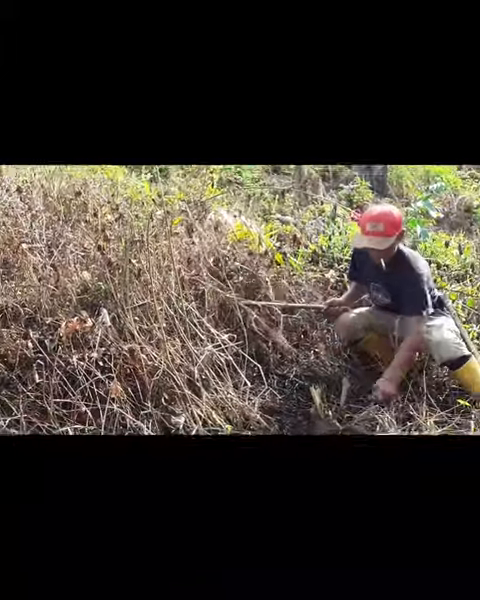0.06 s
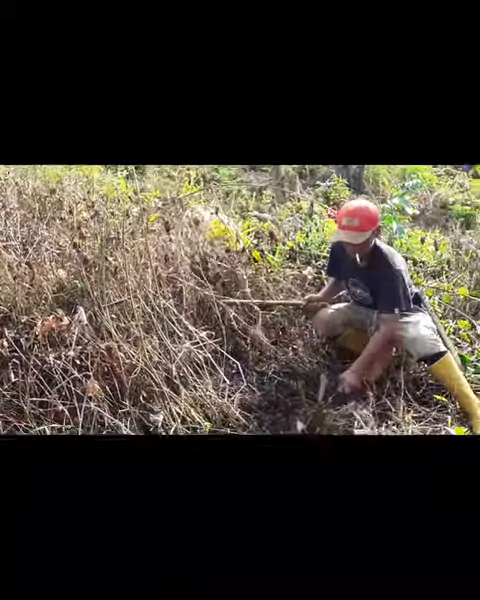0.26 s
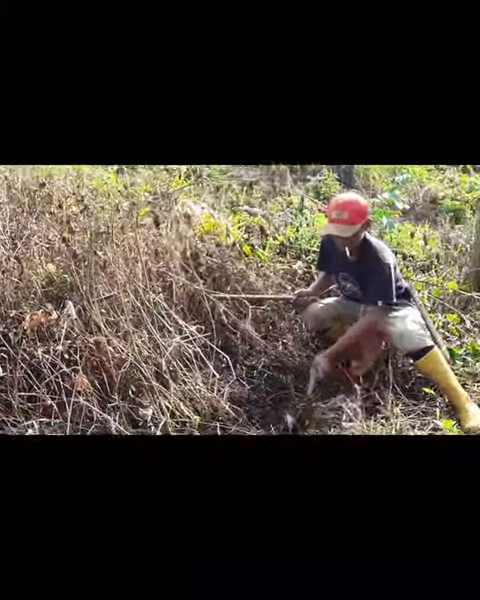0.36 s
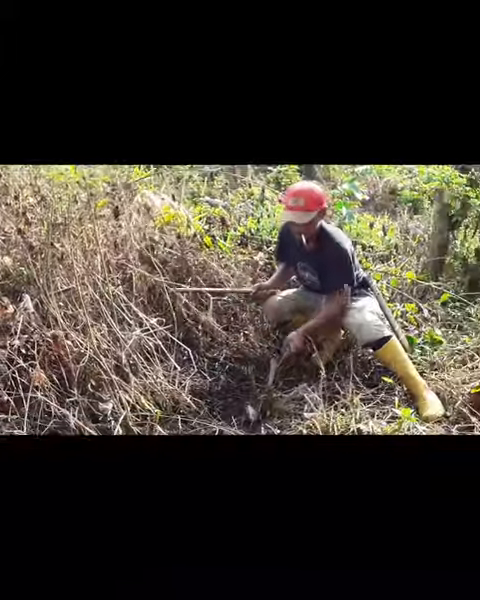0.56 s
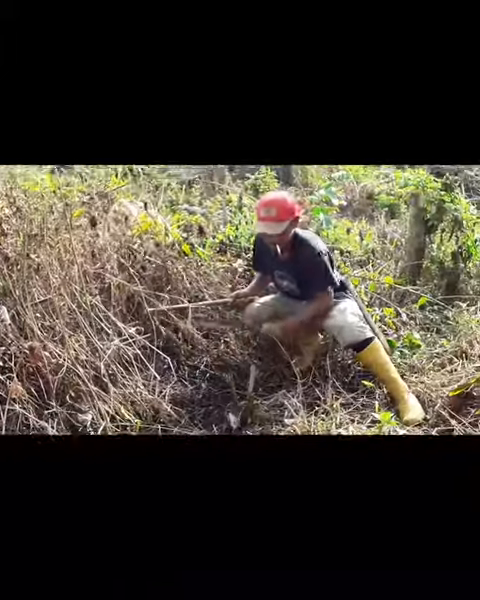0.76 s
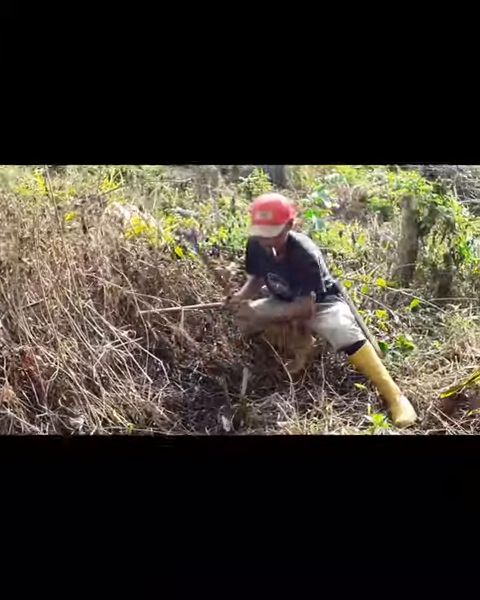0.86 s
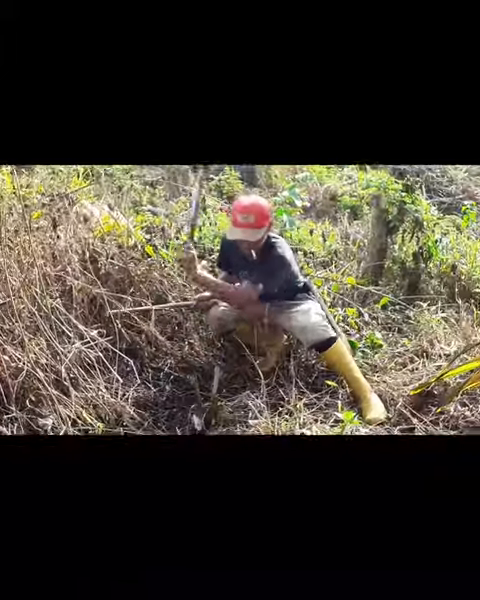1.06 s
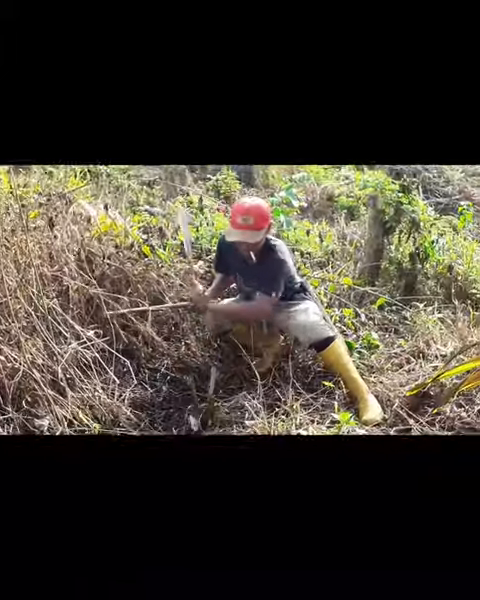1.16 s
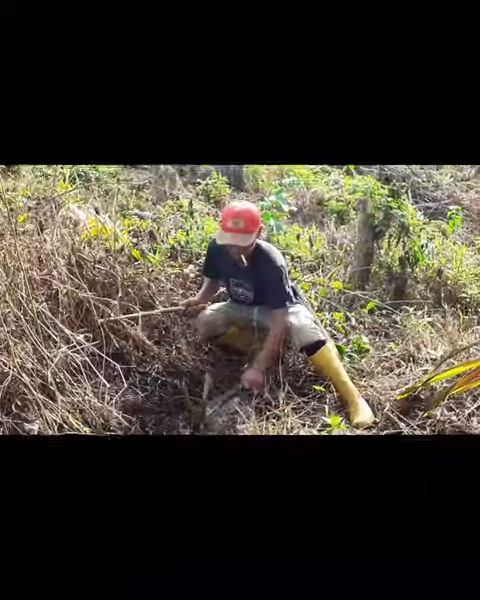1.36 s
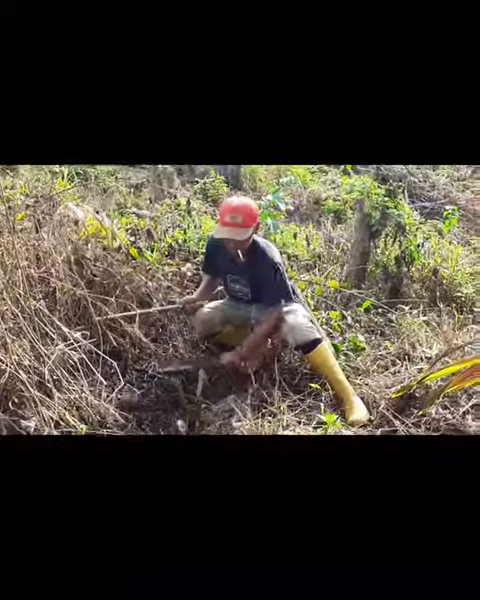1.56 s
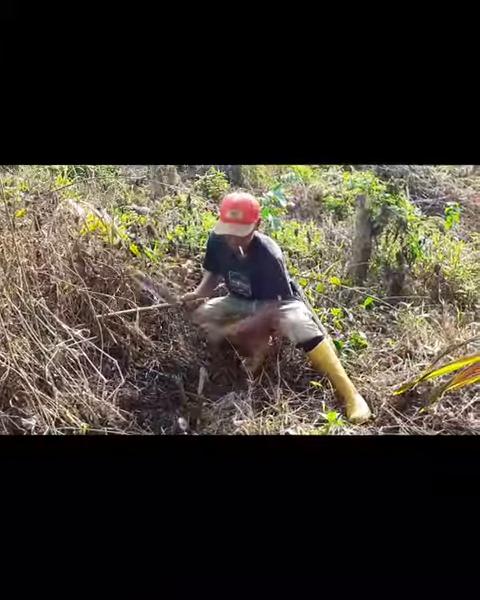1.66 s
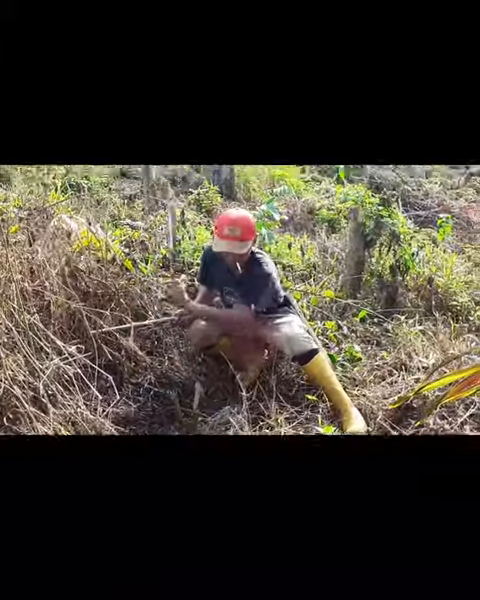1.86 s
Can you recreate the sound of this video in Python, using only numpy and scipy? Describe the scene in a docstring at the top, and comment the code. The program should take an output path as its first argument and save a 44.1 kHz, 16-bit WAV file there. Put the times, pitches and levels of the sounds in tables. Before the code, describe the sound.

Two sharp machete chops crack through dry brush outdoors, amid rustling stems, birdsong and cricket trill

```python
"""A machete chops twice through dry weeds into the ground, close to a two-port microphone outdoors.
Each chop is a burst of dense clicks, a short blade ring, a tumble of stem bits and thuds of ringing soil.
Around the blows, filtered crackle makes the weeds swish, and stems snap and knock.
Several birds call as gliding near-sine or reedy tones with an echo; a cricket trills in pulses of
narrow noise over the hiss of far insects and birds, which is shaped noise with a low rumble."""
import sys
import numpy as np
from scipy import signal
from scipy.fft import rfft, irfft, next_fast_len
from scipy.io import wavfile
from scipy.ndimage import uniform_filter1d

SR = 44100
rng = np.random.default_rng(int(sys.argv[2]) if len(sys.argv) > 2 else 0)


def linear_from_db(decibels):
    """Turn decibels (scalar or array-like) into linear amplitude factors; 0 gives 1."""
    return 10 ** (np.asarray(decibels, float) / 20)


def wav_out(sig):
    """Save sig, one row per channel (or a flat mono array), as 16-bit PCM at SR to the path in sys.argv[1]."""
    wavfile.write(sys.argv[1], SR, np.round(np.clip(np.atleast_2d(sig).T, -1, 1) * 32767).astype(np.int16))


N = 83790  # length of the scene in samples

# Levels in all tables come before panning, flutter, echo and the final filters.
# Tone colour of cut stems: pitch_hz, relative level_db
STEM_COLOUR = [(240, -25), (400, -4.5), (921, -13), (2930, -5), (3750, -0.5), (8760, -7), (14600, -12)]


def evened(x):
    """Scales a sound to an rms of 1."""
    return x / np.sqrt(np.mean(x ** 2) + 1e-20)


def read(points, hz):
    """Reads a table at any pitch, in straight lines over log pitch."""
    f, value = np.transpose(points)
    return np.interp(np.log(hz + 1), np.log(f + 1), value)


def add(mix, start_s, sound):
    """Lays a sound into the mix, cut off at the end."""
    at = round(start_s * SR)
    part = mix[..., at:at + sound.shape[-1]]
    part += sound[..., :part.shape[-1]]


def pan(left_minus_right_db):
    """Gains of left and right for a level difference."""
    half_db = left_minus_right_db / 2
    return linear_from_db(np.array([[half_db], [-half_db]]))


def colour(x, points):
    """Filters the last axis by a spectrum table."""
    size = next_fast_len(x.shape[-1] + 512)
    gain = linear_from_db(read(points, np.fft.rfftfreq(size, 1 / SR)))
    return irfft(rfft(x, size) * gain, size)[..., :x.shape[-1]]


def crackle(shape, per_s, spread_db):
    """Randomly timed clicks of random sign, a few of them large."""
    size = linear_from_db(spread_db * np.minimum(rng.exponential(1, shape), 4))
    sign = rng.choice([-1., 1.], shape)
    return size * sign * (rng.random(shape) < per_s / SR)


def slow(top_hz, span=15):
    """Slow random wander of rms 1: 20 sines from top_hz / span to top_hz, weaker as they get faster."""
    t = np.arange(N) / SR
    rates = np.geomspace(top_hz / span, top_hz, num=20)
    return evened(sum(np.sin(2 * np.pi * (f * t + rng.random())) / np.sqrt(f) for f in rates))


def rise_fall(t, rise, t60):
    """Bell-shaped rise to t = 0, then an even fall in dB."""
    return np.exp(-(np.minimum(t, 0) / rise) ** 2) * linear_from_db(-60 * np.maximum(t, 0) / t60)


def ring(modes, tilt_db, t, share=1):
    """Dying modes of a struck thing; the tilt is in dB per octave from the second mode."""
    out = 0
    for hz, db, t60 in modes:
        level_db = db + tilt_db * np.log2(hz / modes[1][0]) - 60 * t / t60 / share
        out = out + linear_from_db(level_db) * np.sin(2 * np.pi * hz * t)
    return out


def machete():
    """The two chops and the thuds on the soil, as they reach the two ports."""
    return two_ports(chops() + thuds())


def chops():
    """The blade bursts through stems and rings briefly, and the cut stems tumble."""
    # loudest_s, crack level_db, rise_s, crack t60_s, falling stems level_db before bits, stems t60_s
    blows = [(0.2034, -16.5, .002, 0.023, -33, .12), (1.395, -16, 0.00091, 0.023, -35.5, 0.13)]
    # Tone colour of the crack: pitch_hz, relative level_db
    crack_colour = [(240, -33.5), (400, -11.5), (800, 0.5), (1060, -18), (1350, 2.5), (2840, 0),
                    (4580, 0.5), (6640, -2.5), (8760, -0.5), (10400, -9.5), (14800, -8), (16400, -44)]
    # Ringing of the blade: pitch_hz, relative level_db, t60_s
    blade_modes = [(3820, -8, 0.084), (4720, -6, .16)]
    blade_db, bits_share = -38, 2  # bits_share: rms of the stem bits against the stem crackle
    mix, t = np.zeros((2, N)), np.arange(SR // 2) / SR
    for s, crack_db, rise, t60, stems_db, stems_t60 in blows:
        u = t - 4 * rise  # time from the loudest moment
        crack = evened(colour(crackle(len(t), 16000, 3.5), crack_colour))
        burst = linear_from_db(crack_db) * rise_fall(u, rise, t60) * crack
        # one crackle shared by both sides, and one for each side
        stems = crackle(len(t), 5000, 3) + crackle((2, len(t)), 5000, 3)
        stems = evened(colour(stems, STEM_COLOUR)) + bits_share * debris(len(t))
        tumble = linear_from_db(stems_db - 60 * t / stems_t60) * np.clip(u / rise / 2 + 1, 0, 1)
        add(mix, s - 4 * rise, burst + tumble * stems)
        add(mix, s, linear_from_db(blade_db) * ring(blade_modes, 0, t))
    return mix


def debris(size):
    """Bits of stem of many sizes, each a short woody ring."""
    cycles, hits_per_s = 11, 30  # rate for each size, in the shared and in each side's crackle
    out = np.zeros((2, size))
    for hz in np.geomspace(900, 9500, num=24):
        turns = np.arange(int(SR * cycles / hz)) * hz / SR
        fade = linear_from_db(read(STEM_COLOUR, hz) - 40 * turns / cycles)
        grain = np.sin(2 * np.pi * turns) * fade * hz
        hits = crackle(size, hits_per_s, 4) + crackle((2, size), hits_per_s, 4)
        out += signal.oaconvolve(hits, grain[None], axes=1)[:, :size]
    return evened(out)


def thuds():
    """Struck soil rings in a few low modes after a short straight rise."""
    # Modes of the soil: pitch_hz, relative level_db, t60_s before each thud's share
    soil_modes = [(64.5, -11, 0.13), (104.4, 2.5, 0.13), (155.2, -9.5, 0.17), (246, 4, 0.069),
                  (301, 3.5, 0.076), (549, -7, 0.051)]
    # start_s, level_db, tilt_db per octave toward the higher modes, share of the ring time
    thud_rows = [(.201, -38.5, 3.5, 1.02), (.262, -56, -5.5, 0.91), (1.004, -69.5, -6, 1.4),
                 (1.318, -57, -2, .7), (1.396, -38, -0.3, 1.34), (1.836, -54.5, 3.5, 0.53)]
    rise_s = 0.0039
    mix, t = np.zeros((2, N)), np.arange(SR // 2) / SR
    for s, db, tilt_db, share in thud_rows:
        add(mix, s, linear_from_db(db) * np.minimum(t / rise_s, 1) * ring(soil_modes, tilt_db, t, share))
    return mix


def two_ports(x):
    """Close sounds reach the two ports with a level and phase difference at each pitch."""
    # pitch_hz, left minus right level_db
    port_levels = [(60, -3.5), (550, -3.5), (1400, 1.5), (5500, -7), (9000, 6), (15000, 7.5)]
    # pitch_hz, left lead_rad
    port_leads = [(0, 0), (3880, 2), (6030, 17.5), (13100, 19.5), (15100, 36.5)]
    hz = np.fft.rfftfreq(N, 1 / SR)
    lead = np.interp(hz, *np.transpose(port_leads))
    half = linear_from_db(read(port_levels, hz) / 2) * np.exp(.5j * lead)  # each side takes half the difference
    return irfft(rfft(x) * np.array([half, 1 / half]), N)


def weeds():
    """Dry weeds: swishing leaves, single snaps and hollow knocks."""
    return swishes() + snaps() + knocks()


def swishes():
    """Clumped crackle of dry leaves that swells and fades."""
    # loudest_s, level_db, rise_s, t60_s
    swish_rows = [(.255, -51, 0.061, 0.32), (.345, -57, 0.047, 0.53), (.545, -65.5, 0.013, 0.9),
                  (.695, -66, 0.069, 1), (0.923, -59.5, 0.0088, 0.37), (1.338, -62.5, 0.036, 1),
                  (1.44, -55, 0.024, 0.66), (1.393, -38, 0.0032, 0.025), (1.695, -61, 0.015, 0.94),
                  (1.838, -57, 0.026, 0.29)]
    # Tone colour of leaves: pitch_hz, relative level_db
    leaf_colour = [(350, -32), (700, -16), (1130, -20), (2440, -7), (4500, -8.5), (8270, -9), (15300, -11),
                   (16000, -38)]
    t = np.arange(N) / SR
    power = sum((linear_from_db(db) * rise_fall(t - s, rise, t60)) ** 2 for s, db, rise, t60 in swish_rows)
    leaves = evened(colour(crackle((2, N), per_s=2200, spread_db=0.5), leaf_colour))
    clumps = linear_from_db(1.5 * slow(65))
    return leaves * np.sqrt(power) * clumps * pan(-2)


def snaps():
    """A snapping stem gives a click and a short puff of noise within a band."""
    # start_s, level_db before the band filter, low_hz, high_hz, left minus right level_db
    snap_rows = [(0.177, -46, 3000, 15000, 2), (0.4195, -42.5, 6000, 14700, 14.5),
                 (0.5744, -34, 4950, 6900, 5), (0.581, -46.5, 6000, 14000, 17),
                 (0.9213, -38, 1550, 15000, 10), (1.576, -46, 7020, 15000, 15.5),
                 (1.6878, -43, 8000, 15200, 17), (1.8004, -39.5, 1970, 13000, 7.5),
                 (1.8354, -37, 710, 15000, -12.5), (1.8424, -41.5, 5000, 15000, -18)]
    rise_s, t60_s, click = 0.00087, .0055, 1.18  # click: its height against the puff
    mix, t = np.zeros((2, N)), np.arange(3000) / SR
    for s, db, low_hz, high_hz, pan_db in snap_rows:
        puff = rng.standard_normal((2, len(t))) * rise_fall(t - rise_s, rise_s / 2, t60_s)
        puff = (puff + 0.4 * puff[::-1]) / 2  # the sides share part of the noise
        puff[:, round(rise_s * SR)] += click
        band = signal.butter(3, [low_hz, high_hz], "band", fs=SR, output="sos")
        add(mix, s, linear_from_db(db) * pan(pan_db) * signal.sosfilt(band, puff))
    return mix


def knocks():
    """A hollow stem rings as one dying tone."""
    # start_s, level_db
    knock_rows = [(.345, -70), (.918, -66)]
    pitch_hz, t60_s = 734, 0.046
    mix, t = np.zeros((2, N)), np.arange(3000) / SR
    for s, db in knock_rows:
        add(mix, s, linear_from_db(db - 60 * t / t60_s) * np.sin(2 * np.pi * pitch_hz * t))
    return mix


def bird(calls, partials, pan_db, wet_db, flutter_db=3):
    """Calls along their pitch curves, with wobble, flutter and the echo of the grove."""
    flutter_hz = 130
    mix, wobble = np.zeros(N), 1 + .005 * slow(flutter_hz)
    for call in calls:
        s, hz, db = np.transpose(call)
        t = np.arange(s[0], s[-1], 1 / SR)
        pitch = uniform_filter1d(np.interp(t, s, hz), size=60)
        turns = np.cumsum(pitch * np.interp(t * SR, np.arange(N), wobble)) / SR
        edge = np.clip(np.minimum(t - s[0], s[-1] - t) / 0.004, 0, 1)  # 4 ms fades
        tone = sum(linear_from_db(p_db) * np.sin(2 * np.pi * k * turns) for k, p_db in partials)
        add(mix, s[0], np.sqrt(2) * edge * linear_from_db(np.interp(t, s, db)) * tone)
    mix = mix * linear_from_db(flutter_db * slow(flutter_hz, span=3))
    return pan(pan_db) * (mix + linear_from_db(wet_db) * grove_echo(mix))


def grove_echo(x):
    """Many small reflections from the grove, dying away after a short gap."""
    t60_s, gap_s = 0.41, 0.0089
    t = np.arange(SR // 2) / SR
    tail = crackle((2, len(t)), 2000, 0.4) * linear_from_db(-60 * t / t60_s) * (t > gap_s)
    return signal.fftconvolve(x[None], tail / np.linalg.norm(tail[0]), axes=1)[:, :N]


def chirping_bird():
    """Thin high chirps of a small bird, each an arch of pitch in a near-sine tone."""
    # start_s, length_s, first_hz, top_hz, last_hz, top at share of length, level_db, loudest at share
    chirp_rows = [(0.376, 0.032, 7400, 8740, 7200, 0.14, -54, 0.42),
                  (1.315, 0.065, 9650, 9700, 8000, 0.11, -59.5, 0.84),
                  (1.466, 0.098, 8260, 9150, 8300, 0.45, -59, 0.65),
                  (1.619, 0.041, 8000, 9020, 8050, 0.43, -56, 0.29),
                  (1.716, 0.045, 8320, 8570, 8420, 0.58, -55, 0.75),
                  (1.811, 0.057, 7750, 8670, 8400, 0.44, -53, 0.6)]
    return bird([arch(*row) for row in chirp_rows], [(1, 0.046)], -13.0, -10, flutter_db=3.5)


def arch(start, length, first_hz, top_hz, last_hz, top, db, loudest):
    """Pitch and level curve of one chirp."""
    rise_power, fall_power, edge_db = 4.7, 1.9, -8.5  # power 1 is straight, 2 is round
    u = np.linspace(0, 1, num=24)
    rising = (top_hz - first_hz) * abs(1 - u / top) ** rise_power
    falling = (top_hz - last_hz) * abs((u - top) / (1 - top)) ** fall_power
    hz = top_hz - np.where(u < top, rising, falling)
    level_db = db + np.interp(u, [0, loudest, 1], [edge_db, 0, edge_db / 2])
    return np.transpose([start + u * length, hz, level_db])


def singing_bird():
    """A repeating song of a rising note, a falling whistle and a low warble, in near-sine tones."""
    # The three notes: time_s, pitch_hz, level_db
    rising_note = [(1.14, 1300, -84), (1.16, 2000, -70), (1.174, 2330, -68)]
    whistle = [(1.197, 3040, -76), (1.21, 3040, -70), (1.248, 3103, -65), (1.268, 2950, -73),
               (1.281, 2720, -53), (1.308, 2480, -70)]
    warble = [(1.472, 2720, -63), (1.505, 2380, -62.5), (1.535, 2420, -64.5), (1.553, 2275, -55.5),
              (1.57, 2115, -88.5)]
    song = twice(rising_note, later_s=.622, db=-4)
    song += twice(whistle, later_s=.617, db=-0.097)
    song += twice(warble, later_s=-.605, db=-4)  # the added warble comes earlier
    return bird(song, [(1, 0.046)], 0.11, -3.5)


def twice(call, later_s, db):
    """A call and its copy at another time and level."""
    return [call, np.array(call) + [later_s, 0, db]]


def far_bird():
    """Farther falling notes in near-sine tones, with more echo than direct sound."""
    # One list for each note: time_s, pitch_hz, level_db
    falling_notes = [
        [(.435, 2710, -77), (.5, 2380, -78)],
        [(.6, 2813, -68), (.665, 2210, -73)],
        [(.705, 2492, -71), (.76, 2236, -70.5)],
        [(1.625, 3216, -63), (1.68, 2930, -71.5), (1.71, 2780, -69)],
    ]
    return bird(falling_notes, [(1, 0.046)], 0.09, 3.1)


def reedy_bird():
    """Reedy notes of three partials, the second strongest, with added buzzes."""
    # One list for each note: time_s, pitch_hz of the second partial, level_db
    reed_notes = [
        [(.552, 3900, -76), (.576, 3900, -61), (.598, 4190, -67), (.608, 4290, -74)],
        [(1.018, 3905, -76), (1.05, 3790, -69), (1.104, 3800, -65), (1.12, 4010, -66), (1.14, 4030, -66)],
        [(1.61, 3840, -68), (1.655, 3946, -72.5)],
    ]
    # Multiple of the second partial's pitch, relative level_db
    reed_partials = [(.5, -11), (1, 0), (1.5, -15)]
    # start_s, length_s, level_db at the start
    buzz_rows = [(0.598, 0.074, -74.5), (1.647, 0.098, -74.5)]
    return bird(reed_notes + [buzz(*row) for row in buzz_rows], reed_partials, .1, -6)


def buzz(start, length, db):
    """A fast uneven trill around one pitch, 6 dB louder in its middle."""
    t = np.arange(0, length, .001)
    trill_per_s = 37 * rng.uniform(0.394, 1.5, len(t))
    swing_hz = 340 * rng.uniform(0.24, 1.14, len(t))
    hz = 3940 + swing_hz * np.sin(2 * np.pi * np.cumsum(trill_per_s) / 1000)
    return np.transpose([start + t, hz, db + 6 * np.sin(np.pi * t / length)])


def cricket():
    """Steady pulses, each a short rising scrape of narrow noise near one pitch."""
    # time_s, pulses_per_s
    pulse_rate = [(0, 63), (.4, 70.6), (1.9, 69.8)]
    pitch_hz, sweep_hz, pole_width_hz = 8400, 485, 93
    level_db, sounding_share, start_share = -70.5, .45, 0.88  # shares of a pulse
    t = np.arange(N) / SR
    pulses = np.cumsum(np.interp(t, *np.transpose(pulse_rate))) / SR + start_share
    at = np.minimum(pulses % 1 / sounding_share, 1)  # place within the scrape, then rest at 1
    gate = np.sin(np.pi * at) ** 2
    turn = np.exp(2j * np.pi * np.cumsum(pitch_hz + sweep_hz * (at - .5)) / SR)
    r = np.exp(-np.pi * pole_width_hz / SR)
    noise = rng.standard_normal((2, N)) + 1j * rng.standard_normal((2, N))
    fuzz = signal.lfilter([1], np.convolve([1, -r], [1, -r]), noise)
    scrape = evened(gate * (turn * fuzz).real)
    return scrape * linear_from_db(level_db + 1.1 * slow(10)) * pan(-4)


def air():
    """Hiss of far insects and birds with drifting patches, over a low rumble."""
    # Tone colour of the air: pitch_hz, relative level_db
    air_colour = [(18, -59), (40, -19.5), (115, -8), (184, -18), (345, -8.5), (480, -20.5), (1460, -27),
                  (1860, -26), (2230, -6), (2750, -13.5), (3200, -18.5), (6050, -18), (6900, -2.5),
                  (8300, -1), (8900, -8), (9400, -36), (12000, -18.5), (14800, -15.5), (16200, -49)]
    # pitch_hz, left minus right level_db
    air_sides = [(60, -9.5), (380, -3), (2380, -11.5), (15000, 0)]
    frames, hz = N // 128 + 5, np.fft.rfftfreq(512, 1 / SR)
    a, b, c, d, patches = rng.standard_normal((frames, 257, 5)).T
    patches = uniform_filter1d(patches, 5, 0)  # smooth over pitch
    patches = evened(uniform_filter1d(patches, 14, 1))  # and over time
    lean = read(air_sides, hz)[:, None] / 2
    z = np.array([(a + 1j * b) * linear_from_db(lean), (c + 1j * d) * linear_from_db(-lean)]) * linear_from_db(3.6 * patches)
    noise = signal.istft(z, nperseg=512, noverlap=384)[1][:, :N]
    return linear_from_db(-61.5) * evened(colour(noise, air_colour))


def scene():
    """Adds the chopping, the weeds, the birds, the cricket and the air."""
    birds = chirping_bird() + singing_bird() + far_bird() + reedy_bird()
    return machete() + weeds() + birds + cricket() + air()


def low_pass(x):
    """Removes everything above the highest recorded frequency."""
    return signal.sosfilt(signal.butter(12, 16470, fs=SR, output="sos"), x)


def record(dry):
    """Cuts the deepest bass below about 47 Hz and the treble above 16.2 kHz."""
    low = signal.butter(3, 46.8, "high", fs=SR, output="sos")
    top = signal.firwin(255, 16200, window=("kaiser", 9), fs=SR)
    mix = signal.oaconvolve(signal.sosfilt(low, dry), top[None], "same")
    return low_pass(mix)


dry = scene()
out = record(dry)
wav_out(out)
```